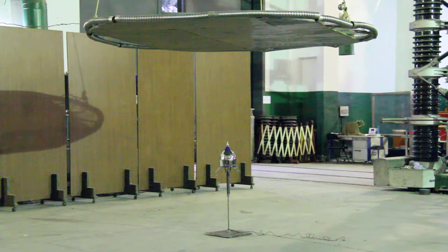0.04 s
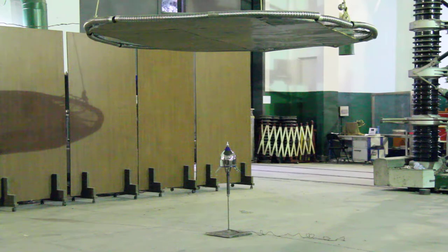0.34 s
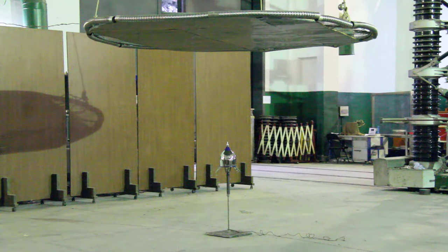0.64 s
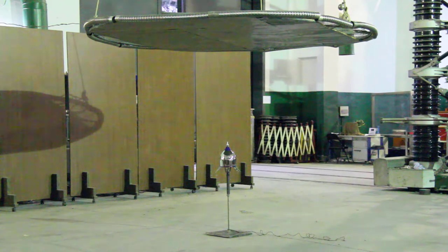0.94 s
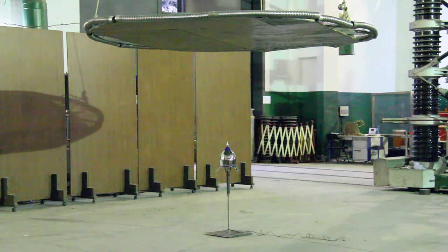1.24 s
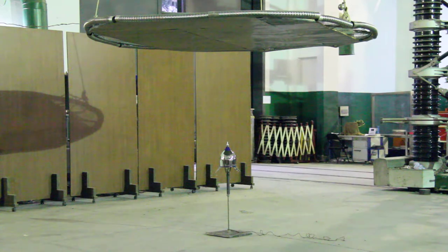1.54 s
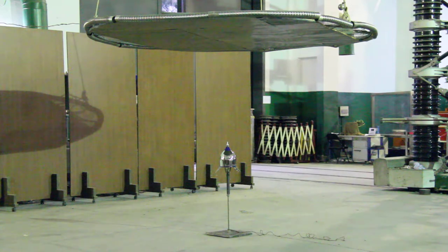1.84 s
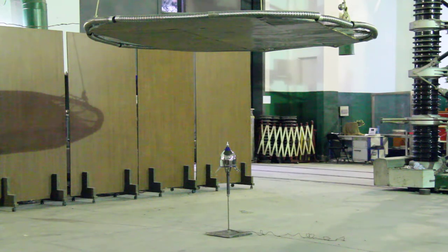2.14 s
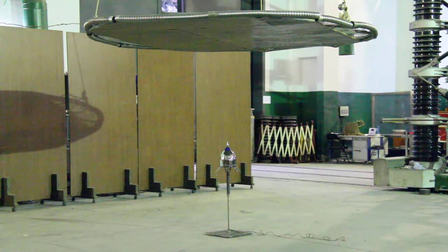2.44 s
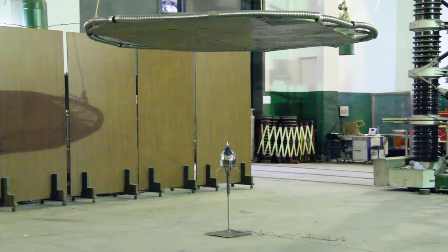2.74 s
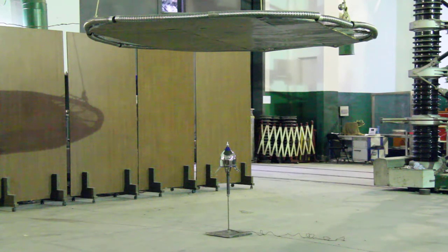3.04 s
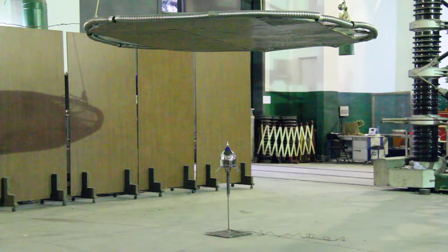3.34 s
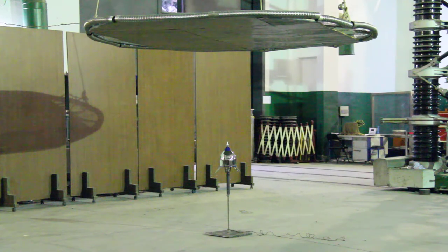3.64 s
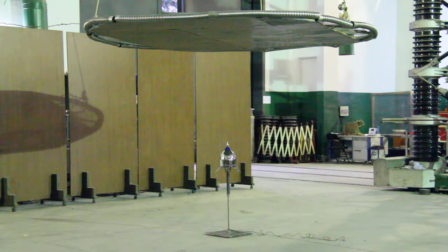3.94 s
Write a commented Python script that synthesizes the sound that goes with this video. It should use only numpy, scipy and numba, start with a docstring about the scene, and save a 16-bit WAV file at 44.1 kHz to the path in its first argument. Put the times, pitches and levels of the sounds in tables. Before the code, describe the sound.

One high-voltage spark bangs over faint hum, leaving a long echoing roar in the hall.

```python
"""A high-voltage spark jumps from a hanging electrode in a large laboratory hall.
The air hisses and ticks as the voltage rises, then cracks; the hall roars on for seconds, ever duller.
The blast overloads the microphone, and the camera's gain control holds the dying roar almost level.
Transformer hum, ventilation and microphone hiss run underneath."""
import sys
import numpy as np
from scipy import signal
from scipy.fft import rfft, irfft, next_fast_len
from scipy.io import wavfile
from scipy.ndimage import map_coordinates
from numba import njit

SR = 44100
rng = np.random.default_rng(int(sys.argv[2]) if len(sys.argv) > 2 else 0)


def int16_out(signal):
    """Quantize to a 16-bit WAV file."""
    q = np.round(np.clip(np.atleast_2d(signal).T, -1, 1) * 32767)
    wavfile.write(sys.argv[1], SR, q.astype(np.int16))


N = 176400
T = np.arange(N) / SR

# ventilation and microphone hiss: freq_hz, density_db_per_hz
AIR_SPECTRUM = [(15, -60), (30, -43), (60, -49.5), (130, -65), (185, -62.5), (240, -71.5), (400, -70),
                (700, -74.5), (1200, -77.5), (1800, -80), (2500, -87), (3500, -96), (5000, -99),
                (7000, -101), (10000, -102), (15000, -107)]
# strong transformer lines: pitch_hz, rms_db
HUM_LINES = [(99.9, -39.5), (149.9, -47), (199.9, -48), (499.7, -51.7), (699.6, -50), (899.5, -61),
             (949.4, -59), (1099.3, -52.3), (1149.3, -62), (1699, -66), (3148, -73), (4347, -70),
             (4747, -75)]
# envelope of the weak upper mains harmonics: freq_hz, line_rms_db
BUZZ_SPECTRUM = [(1000, -70), (1700, -73), (2500, -82.5), (3800, -84.5), (4600, -84.5), (5600, -83),
                 (6700, -94.5), (8100, -85.5), (9200, -93.5), (12000, -94.5)]
# corona at full strength: freq_hz, density_db_per_hz
CORONA_SPECTRUM = [(2500, -120), (4200, -97.5), (5200, -79.5), (6200, -98), (10000, -99), (15000, -106)]
# small bright ticks with a short room tail: start_s, level_db
TICK_EVENTS = [(1.1319, -35), (3.3657, -26.5)]
# brief treble crackles as the loud roar overloads: start_s, level_db
SPIT_EVENTS = [(1.750, -13), (1.770, -14), (1.818, -16), (1.832, -14), (1.866, -13), (1.97, -7),
               (2.114, -27), (2.312, -27), (2.495, -29.5), (2.662, -31), (2.823, -30), (2.987, -33)]
# hall roar before decay and swells: freq_hz, density_db_per_hz
ROAR_SPECTRUM = [(25, -22), (60, -22), (100, -25.5), (160, -23), (250, -20.5), (400, -17), (700, -14),
                 (1200, -10), (1800, -8.5), (2500, -9.5), (3500, -13.5), (5000, -17.5), (7000, -19),
                 (10000, -20.5), (15000, -31)]
# hall decay: freq_hz, t60_s
HALL_DECAY = [(100, 6.56), (400, 7.09), (800, 7.42), (1200, 6.29), (1800, 5.31), (2500, 4.235), (3500, 3),
              (5000, 1.927), (7000, 1.224), (10000, .8), (15000, .52)]
# clusters of wall echoes: centre_s, half_width_s, boost_db
ECHO_CLUSTERS = [(1.203, 0.016, 4.5), (1.37, .04, 2.5), (1.52, 0.092, 1), (1.892, 0.033, 1.5),
                 (2.33, 0.032, 2), (2.53, 0.018, 1.6)]
# forming spark channel: freq_hz, relative_db
LEADER_SPECTRUM = [(100, -12.5), (2000, 0.5), (4000, -11), (15000, -18)]
# breakdown crack: freq_hz, relative_db
CRACK_SPECTRUM = [(100, -21), (1000, -6), (4000, -3.5), (10000, 4.5), (16000, -0.5)]

MAINS_HZ, BUZZ_SCATTER_DB = 49.97, 6.5
CORONA_FULL_S, CORONA_RISE_DB_PER_S = 1.09, 220
TICK_LOW_CUT_HZ, TICK_T60_S, TICK_ROOM_DB, TICK_ROOM_T60_S = 6000, 0.0076, -15.5, 0.1605
BUILD_DB, BUILD_S, FLUTTER_DB = -7, 0.017, -0.48
LEADER_DB, LEADER_RISE_DB_PER_S = -20.5, 2001.5
SPARK_S, CRACK_DB, CRACK_T60_S = 1.1468, 20.5, 0.032
BLAST_DELAY_S, BLAST_HZ, BLAST_DB, BLAST_T60_S = .002, 330, 35.5, 0.013
MIC_CEILING_DB, MIC_KNEE, MIC_TREBLE_HZ = 26, 14, 11200
AGC_THRESHOLD_DB, AGC_SLOPE = -16.5, 0.85
AGC_ATTACK_S, AGC_RELEASE_S, AGC_SENSE_S = 0.0021, 0.3, 0.006
CHOKE_DB, CHOKE_ATTACK_S, CHOKE_RELEASE_S = -5, .003, .016
LOW_CUT_HZ, HIGH_CUT_HZ = 140, 15900


def amp(db):
    """Decibels to gain."""
    return 10 ** (np.asarray(db) / 20)


def along(points, hz):
    """Interpolate (freq_hz, value) points on a log frequency axis."""
    freqs_hz, values = np.transpose(points)
    return np.interp(np.log(hz + 1), np.log(freqs_hz + 1), values)


def filtered(x, response):
    """Zero-phase filter with gain response(hz)."""
    size = next_fast_len(N + SR // 2)
    return irfft(rfft(x, size) * response(np.fft.rfftfreq(size, 1 / SR)), size)[..., :N]


def noise(spectrum):
    """Noise shaped to (freq_hz, density_db_per_hz) points."""
    return filtered(rng.standard_normal(N), lambda hz: amp(along(spectrum, hz)) * np.sqrt(SR / 2))


def wobble(rate_hz):
    """Smooth random curve, rate_hz knots a second."""
    return map_coordinates(rng.standard_normal(int(N * rate_hz / SR) + 4), [T * rate_hz])


def decay(start_s, t60_s):
    """Instant onset, exponential decay."""
    return (T >= start_s) * np.exp(-np.log(1000) * np.maximum(T - start_s, 0) / t60_s)


@njit
def follow(x, attack_s, release_s):
    """One-pole follower with separate rise and fall times."""
    out, level = np.empty_like(x), 0.
    for i in range(len(x)):
        level += (x[i] - level) / (SR * (attack_s if x[i] > level else release_s))
        out[i] = level
    return out


def room_air():
    """Steady ventilation rumble and microphone hiss."""
    return noise(AIR_SPECTRUM)


def transformer():
    """Mains harmonics: strong, slightly unsteady lines plus a fine buzz."""
    hum = sum(amp(db + .5 * wobble(rate_hz=3)) * np.sin(2 * np.pi * (hz * T + rng.random()))
              for hz, db in HUM_LINES)
    buzz_hz = np.arange(20, 240) * MAINS_HZ
    buzz_db = along(BUZZ_SPECTRUM, buzz_hz) + BUZZ_SCATTER_DB * rng.uniform(-1, 1, len(buzz_hz))
    phasors = np.exp(2j * np.pi * rng.random(len(buzz_hz)))
    bins = np.zeros(N // 2 + 1, complex)
    bins[np.round(buzz_hz * N / SR).astype(int)] = amp(buzz_db) * phasors
    buzz = irfft(bins, N) * N / 2
    return np.sqrt(2) * (hum + buzz)


def corona():
    """Hiss that grows with the voltage and stops at breakdown."""
    rise_db = CORONA_RISE_DB_PER_S * np.minimum(T - CORONA_FULL_S, 0)
    return noise(CORONA_SPECTRUM) * amp(rise_db) * (T < SPARK_S)


def ticks():
    """Bright snaps with a short room tail; spits without one."""
    hiss = filtered(rng.standard_normal(N),
                    lambda hz: hz ** 2 / (hz ** 2 + TICK_LOW_CUT_HZ ** 2) / (1 + (hz / 12000) ** 4))
    snaps = sum(amp(db) * (decay(s, TICK_T60_S) + amp(TICK_ROOM_DB) * decay(s, TICK_ROOM_T60_S))
                for s, db in TICK_EVENTS)
    spits = sum(amp(db) * decay(s, t60_s=.003) for s, db in SPIT_EVENTS)
    return hiss / hiss.std() * (snaps + spits)


def hall_roar():
    """Dense echoes build up and swell in clusters; air absorbs the treble first."""
    hz, frame_s, frames = signal.stft(noise(ROAR_SPECTRUM), SR, nperseg=512)
    fade = np.exp(-np.log(1000) * np.maximum(frame_s - SPARK_S, 0) / along(HALL_DECAY, hz)[:, None])
    tail = signal.istft(frames * fade, SR, nperseg=512)[1][:N]
    swell_db = sum(db * np.exp(-((T - s) / width_s) ** 2) for s, width_s, db in ECHO_CLUSTERS)
    build_db = BUILD_DB * np.exp(-np.maximum(T - SPARK_S, 0) / BUILD_S)
    return tail * amp(swell_db + build_db + FLUTTER_DB * wobble(rate_hz=28)) * (T >= SPARK_S)


def spark():
    """The channel sputters as it forms, then cracks; the heated air sends out a low pressure wave."""
    burst, leader = noise(CRACK_SPECTRUM), noise(LEADER_SPECTRUM)
    sputter_db = LEADER_DB + LEADER_RISE_DB_PER_S * np.minimum(T - SPARK_S, 0)
    sputter = leader / leader.std() * amp(sputter_db) * (T < SPARK_S)
    crack = amp(CRACK_DB) * burst / burst.std() * decay(SPARK_S, CRACK_T60_S)
    blast_s = SPARK_S + BLAST_DELAY_S
    blast = amp(BLAST_DB) * np.sin(2 * np.pi * BLAST_HZ * (T - blast_s)) * decay(blast_s, BLAST_T60_S)
    return sputter + crack + blast


def scene():
    """Mono sum on two channels."""
    mix = hall_roar() + spark() + room_air() + transformer() + corona() + ticks()
    return np.array([mix, mix])


def microphone(x):
    """The capsule flattens peaks and softens the treble."""
    flattened = x / (1 + np.abs(x / amp(MIC_CEILING_DB)) ** MIC_KNEE) ** (1 / MIC_KNEE)
    return filtered(flattened, lambda hz: 1 / np.sqrt(1 + (hz / MIC_TREBLE_HZ) ** 4))


def gain_control(x):
    """Turns loud sound down within milliseconds; recovers slowly."""
    pole = np.exp(-1 / (AGC_SENSE_S * SR))
    level_db = 10 * np.log10(signal.lfilter([1 - pole], [1, -pole], x * x) + 1e-12)
    cut_db = AGC_SLOPE * np.maximum(level_db - AGC_THRESHOLD_DB, 0)
    return x * amp(-follow(cut_db, AGC_ATTACK_S, AGC_RELEASE_S))


def amplifier(x):
    """Clips at full scale and stays briefly choked."""
    overload = (np.abs(x) > 1).astype(float)
    choke = follow(overload, CHOKE_ATTACK_S, CHOKE_RELEASE_S)
    return np.clip(x * amp(CHOKE_DB * choke), -1, 1)


def record(dry):
    """Overloaded microphone, gain control, low cut, clipping, steep high cut."""
    levelled = gain_control(microphone(dry[0]))
    low_cut = signal.butter(3, LOW_CUT_HZ, "high", fs=SR, output="sos")
    clipped = amplifier(signal.sosfilt(low_cut, levelled))
    return filtered(np.array([clipped, clipped]), lambda hz: 1 / (1 + (hz / HIGH_CUT_HZ) ** 160))


dry = scene()
out = record(dry)
int16_out(out)
```